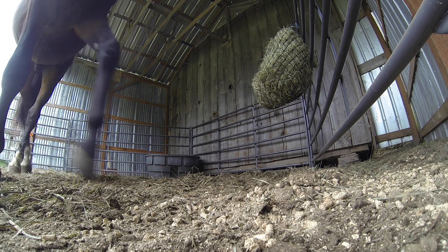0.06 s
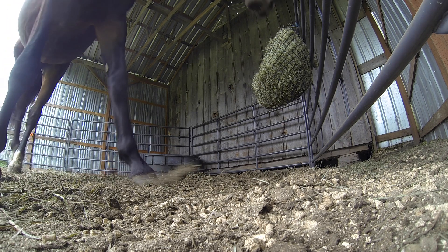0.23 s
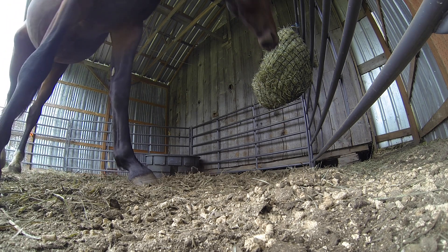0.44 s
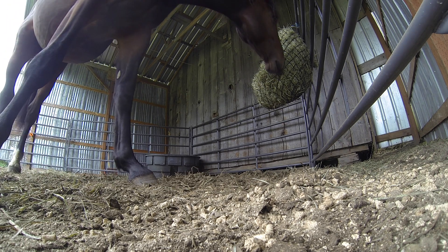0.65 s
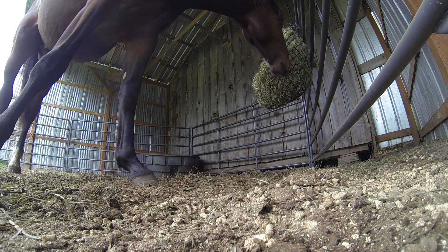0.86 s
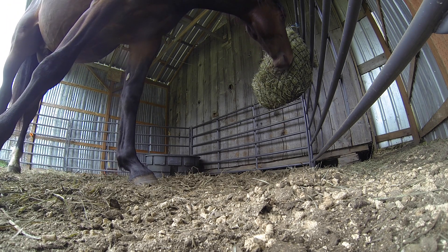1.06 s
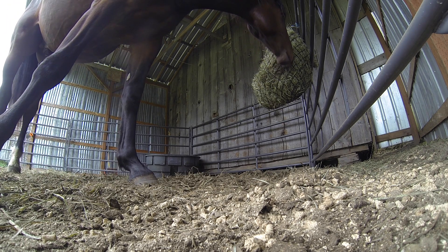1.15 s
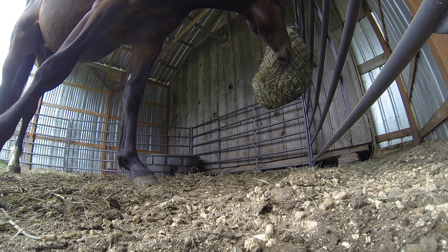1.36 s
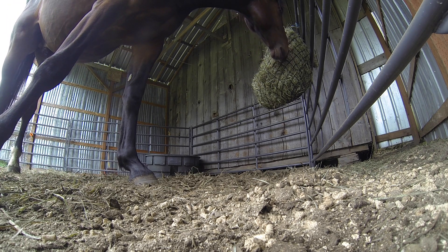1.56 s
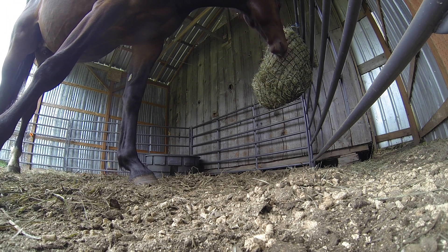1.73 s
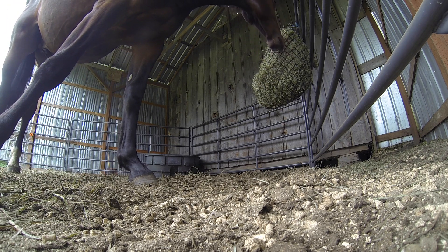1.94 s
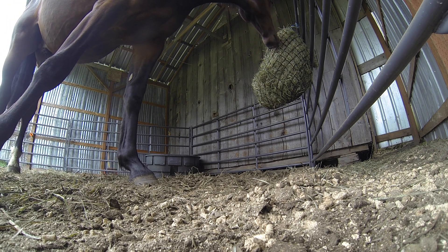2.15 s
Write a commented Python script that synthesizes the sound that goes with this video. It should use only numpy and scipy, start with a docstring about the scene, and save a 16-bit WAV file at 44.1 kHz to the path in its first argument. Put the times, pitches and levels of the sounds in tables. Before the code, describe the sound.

A horse steps twice on a soft dirt barn floor, close to a microphone on the ground. The dull hoof thuds land at about 0.3 and 0.7 seconds, each with a deep, short ring and a muffled puff of dirt. Straw rustles faintly until about 1.1 seconds. A few much softer bumps come around 2 seconds. Quiet rumble, hiss and a thin, pulsing electronic whine run underneath.

```python
"""Dull thuds with a deep ring: a horse takes two steps on the soft dirt floor of a barn.
Each hoof touches, lands and settles, shaking the ground and a camera lying on it close by.
The dirt puffs as it packs down, and straw rustles while the horse shifts its weight.
Underneath are a faint rumble, quiet hiss and the thin pulsing whine of the camera's electronics."""
import sys
import numpy as np
from scipy import signal
from scipy.fft import rfft, irfft
from scipy.io import wavfile

SR = 44100
rng = np.random.default_rng(int(sys.argv[2]) if len(sys.argv) > 2 else 0)


def generate_wav(sig):
    """Save sig (samples, or channels by samples) to the path in sys.argv[1] as 16-bit PCM at SR."""
    pcm = np.round(np.clip(np.atleast_2d(sig).T, -1, 1) * 32767).astype(np.int16)
    wavfile.write(sys.argv[1], SR, pcm)


N = 97020


def amp(db):
    """Turns decibels into a number to multiply a sound by."""
    return 10 ** (np.asarray(db) / 20)


def evened(x):
    """Scales a sound to an average (rms) level of 1."""
    return x / np.sqrt(np.mean(x ** 2) + 1e-20)


def since(start):
    """Seconds gone by since the start time, zero before it."""
    return np.maximum(np.arange(N) / SR - start, 0)


def noise(spectrum):
    """Noise at level 1, its tone shaped by rows of (frequency [Hz], level [dB])."""
    hz, db = np.transpose(spectrum)
    colour_db = np.interp(np.log(np.fft.rfftfreq(N, 1 / SR) + 1), np.log(hz), db)
    white = rng.standard_normal(N)
    return evened(irfft(rfft(white) * amp(colour_db), N))


def swell(t, rise, fade):
    """Rises softly, then dies away by 60 dB every `fade` seconds."""
    return (1 - np.exp(-t / rise)) * np.exp(-np.log(1000) * t / fade)


def ring(tones, t):
    """Tones that build up and die away after a push."""
    return sum(amp(db) * swell(t, rise, fade) * np.sin(2 * np.pi * hz * t) for hz, db, rise, fade in tones)


def background():
    """The low rumble of the barn and a steady hiss."""
    # Tone of each noise (frequency [Hz], level [dB])
    rumble_colour = [(10, -25), (25, 3.5), (48, -1.5), (92, -1.5), (130, -7), (200, -26), (400, -47)]
    hiss_colour = [(60, -4), (170, -0.5), (330, -4), (700, -10), (1400, -13.5), (2400, -17), (3400, -17.5),
                   (4500, -20.5), (6500, -25), (10000, -24), (13300, -27), (15000, -47)]
    return amp(-64.5) * noise(rumble_colour) + amp(-65.5) * noise(hiss_colour)


def electronics():
    """The camera buzzes, sizzles and whines once per picture, beside a faint steady high tone."""
    # Bursts of buzz (place in the cycle [0-1], width [cycles], level [dB])
    bursts = [(.02, 0.033, -4.5), (0.268, 0.088, -9), (.94, 0.049, -11)]
    # Tone of the buzz and of the sizzle between its bursts (frequency [Hz], level [dB])
    buzz_colour = [(1000, -15), (2300, -7), (3200, 1), (4000, -8.5), (5200, -12), (6600, -16), (8000, -5.5),
                   (8800, -15.5), (10100, -3.5), (11200, -20.5), (12000, -6), (13200, -9.5), (14200, -14.5)]
    sizzle_colour = [(4800, -41), (5080, -1), (5320, -3), (5600, -26)]
    # How the whine pulses (place in the cycle [0-1], level [dB])
    whine_levels = [(0, 3), (.12, 11), (.18, -6), (.25, 1), (.33, -6), (.62, -5), (.72, -2), (.86, -1),
                    (.92, 10.5), (1, -10.5)]
    picture_hz, whine_hz, steady_hz = 47.95, 10645, 13187
    t = since(0)
    cycle = t * picture_hz % 1

    def pulse(place, width):
        """A smooth rise and fall, once in each cycle."""
        distance = (cycle - place + .5) % 1 - .5
        return np.exp(-.5 * (distance / width) ** 2)

    buzz = noise(buzz_colour) * sum(amp(db) * pulse(place, width) for place, width, db in bursts)
    sizzle = noise(sizzle_colour) * pulse(place=0.66, width=0.29)
    whine_gain = amp(np.interp(cycle, *np.transpose(whine_levels)))
    wobble = -0.3 * np.sin(2 * np.pi * cycle)
    whine = whine_gain * np.sin(2 * np.pi * whine_hz * t + wobble)
    steady_tone = np.sin(2 * np.pi * steady_hz * t)
    return (amp(-74) * evened(buzz) + amp(-82.5) * evened(sizzle)
            + amp(-76) * evened(whine) + amp(-93.5) * evened(steady_tone))


def straw():
    """Straw and grit rustle faintly as the horse's weight shifts over them."""
    # Loudness of the rustle (time [s], level [dB])
    rustle_levels = [(0, -81), (.2, -80), (.3, -67.5), (.37, -67), (.41, -74.5), (.6, -73), (.7, -69.5),
                     (.83, -73.5), (0.971, -69.5), (1.069, -71), (1.179, -82), (2.2, -83)]
    # Tone of the straw (frequency [Hz], level [dB])
    straw_colour = [(100, -4), (200, 0.5), (400, -1), (700, -5.5), (1300, -10), (3000, -12), (6000, -22.5),
                    (13000, -33)]
    grain_hz, grain_db = 90, 2.5  # a quick random flicker in level makes it grainy
    smoothing = signal.butter(2, grain_hz, fs=SR, output="sos")
    grain = evened(signal.sosfilt(smoothing, rng.standard_normal(N)))
    rustle = evened(noise(straw_colour) * amp(grain_db * grain))
    return amp(np.interp(since(0), *np.transpose(rustle_levels))) * rustle


def soil():
    """Muffled puffs as the dirt packs down under a hoof."""
    # Moments when the dirt gives way (time [s], level [dB])
    scuffs = [(.21, -50), (.28, -59.5), (.682, -49)]
    # Tone of the dirt (frequency [Hz], level [dB])
    soil_colour = [(40, -10), (110, 4), (190, 0), (280, -23), (600, -32), (2000, -52)]
    puffs = sum(amp(db) * swell(since(start), rise=0.0072, fade=0.36) for start, db in scuffs)
    return noise(soil_colour) * puffs


def hooves():
    """Each push of a hoof shakes the ground: a short thud, a low ring and a slow deep boom."""
    # Pushes on the ground (time [s], thud level [dB], ring level [dB], boom level [dB])
    pushes = [(.001, -50, -55.5, -48.5), (0.212, -46, -35, -40), (0.2306, -36, -45, -59),
              (0.2744, -33.7, -18, -27.5), (0.2904, -53, -23.5, -25), (0.3312, -64, -32, -30),
              (0.3586, -45, -34.5, -41), (.56, -56, -49.5, -70), (0.6646, -21.5, -57, -26.5),
              (0.6884, -30.5, -34, -25.5), (0.7185, -42, -66, -34.5), (1.033, -62, -74, -50),
              (1.898, -55, -59.5, -73), (2.05, -50, -56.5, -66), (2.108, -49.5, -51, -62),
              (2.15, -52, -68, -46)]
    # Natural tones of the ground and the camera on it (frequency [Hz], level [dB], rise [s], fade [s])
    thud_tones = [(66.37, 0.5, 0.023, 0.29), (98.5, 0, 0.028, .2), (188.5, -22.5, 0.011, 0.14)]
    ring_tones = [(90.1, 0.014, 0.018, 0.42)]
    boom_tones = [(25.77, -0.5, 0.055, 0.78)]
    steps = np.zeros(N)
    for start, thud_db, ring_db, boom_db in pushes:
        t = since(start)
        steps += amp(thud_db) * ring(thud_tones, t)
        steps += amp(ring_db) * ring(ring_tones, t)
        steps += amp(boom_db) * ring(boom_tones, t)
    return steps


def scene():
    """The steps and the quiet sounds around them, added into one channel."""
    return (hooves() + soil() + straw() + background() + electronics())[None]


def record(dry):
    """Cuts off the very highest treble."""
    cutoff_hz = 15200
    treble_cut = signal.firwin(511, cutoff_hz, window=("kaiser", 9), fs=SR)
    return signal.oaconvolve(dry, treble_cut[None], "same")


dry = scene()
out = record(dry)
generate_wav(out)
```